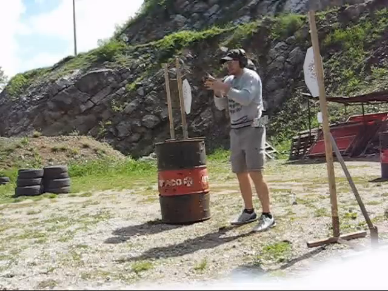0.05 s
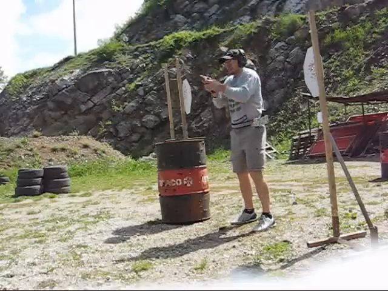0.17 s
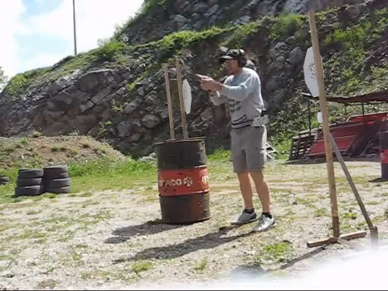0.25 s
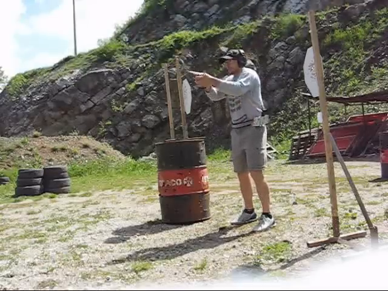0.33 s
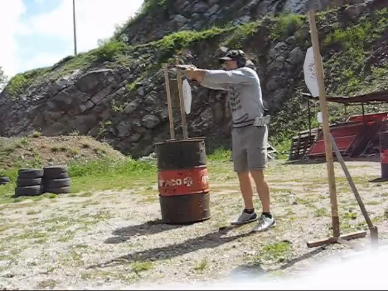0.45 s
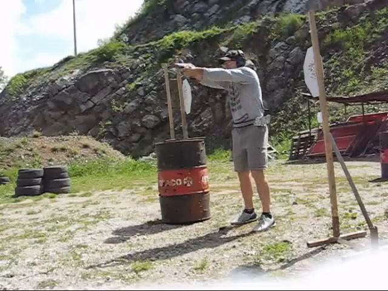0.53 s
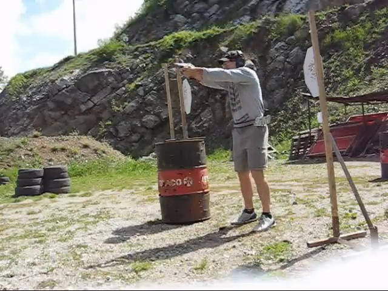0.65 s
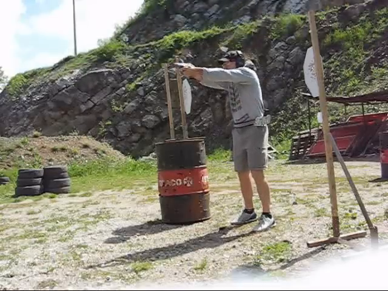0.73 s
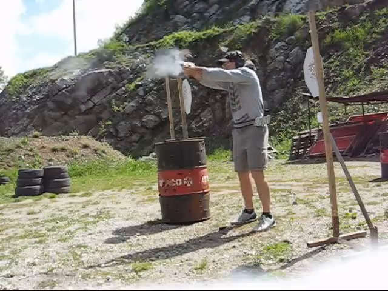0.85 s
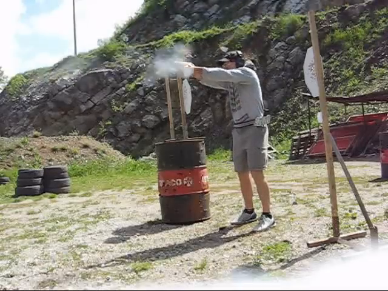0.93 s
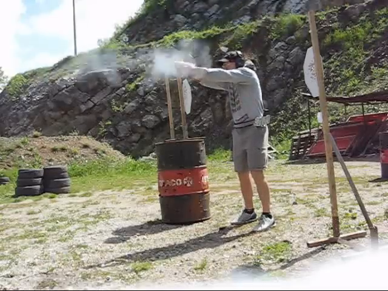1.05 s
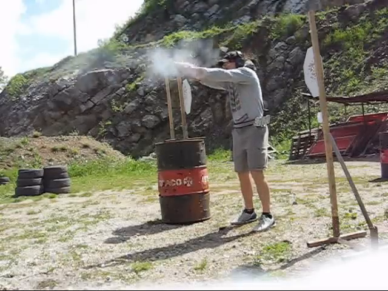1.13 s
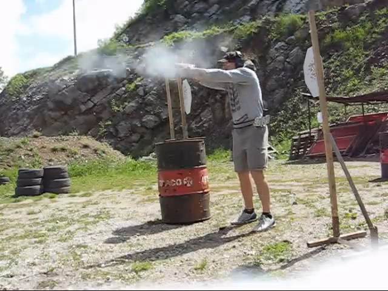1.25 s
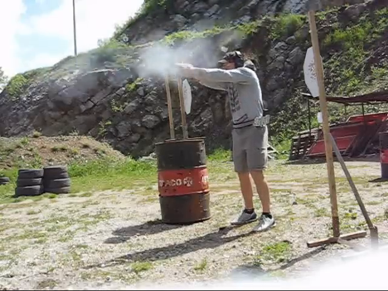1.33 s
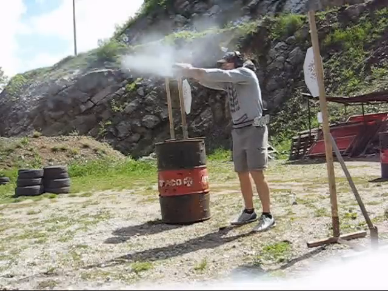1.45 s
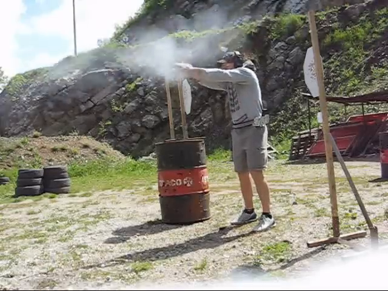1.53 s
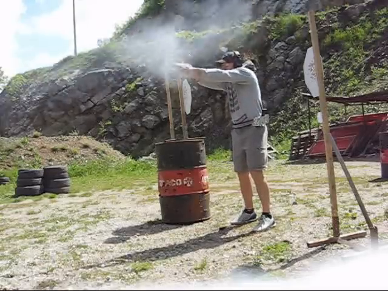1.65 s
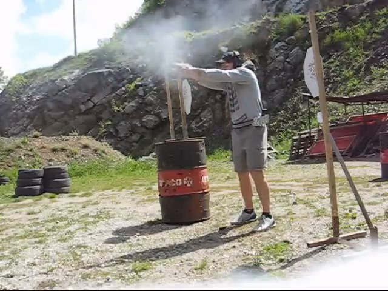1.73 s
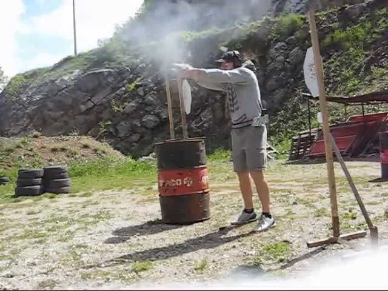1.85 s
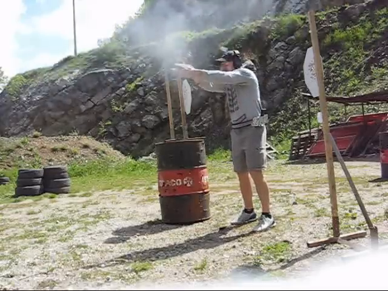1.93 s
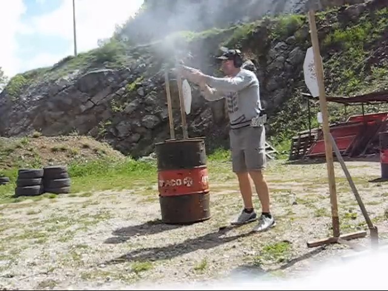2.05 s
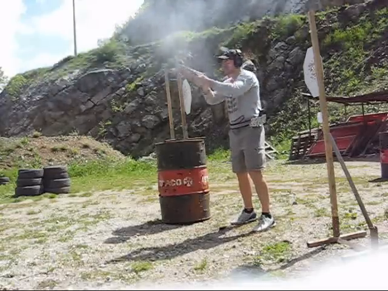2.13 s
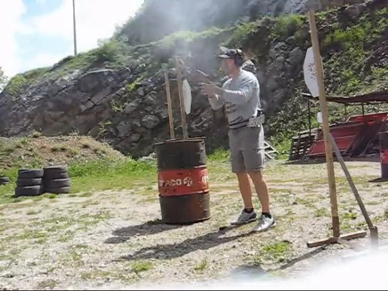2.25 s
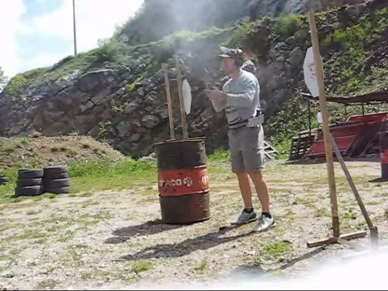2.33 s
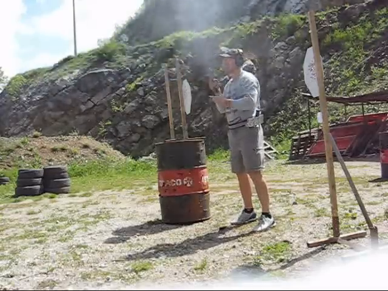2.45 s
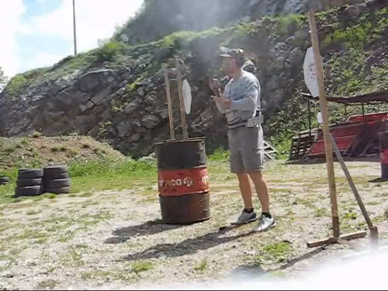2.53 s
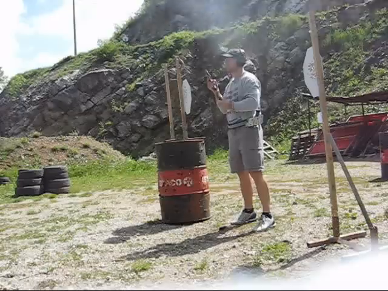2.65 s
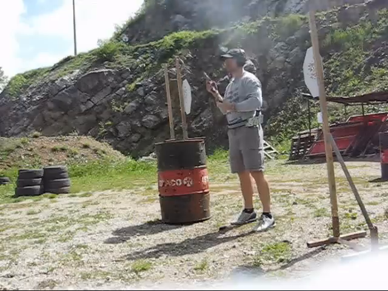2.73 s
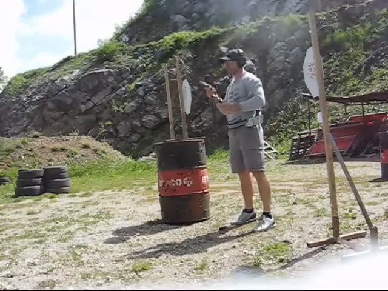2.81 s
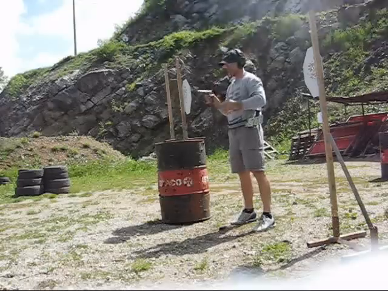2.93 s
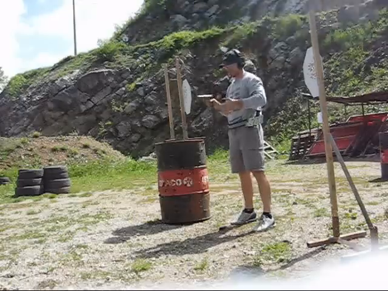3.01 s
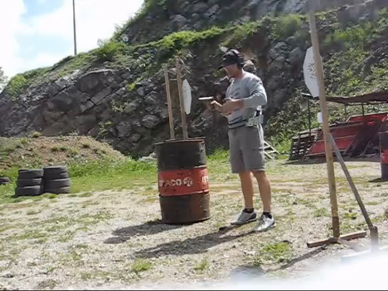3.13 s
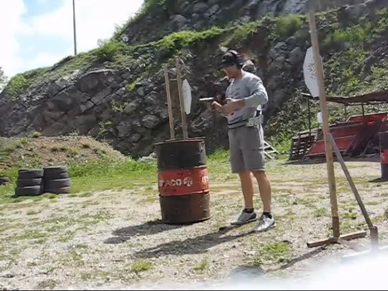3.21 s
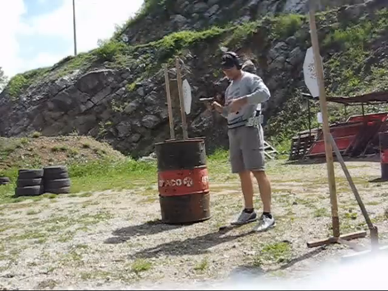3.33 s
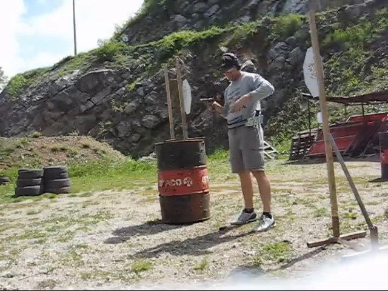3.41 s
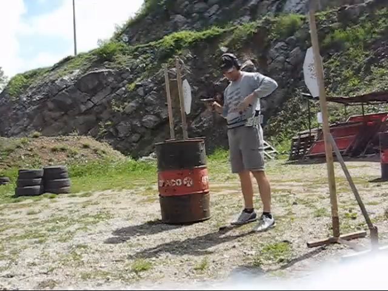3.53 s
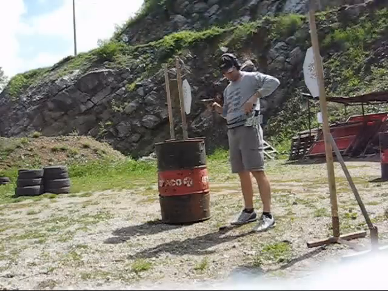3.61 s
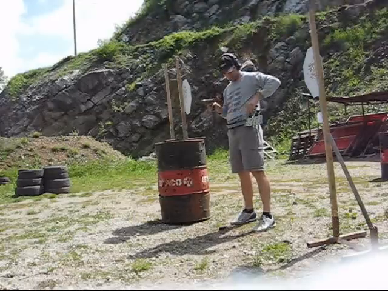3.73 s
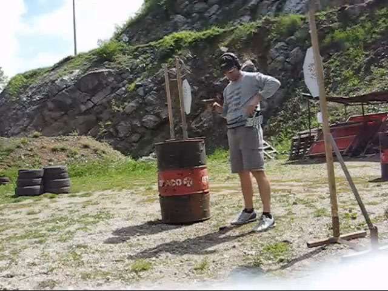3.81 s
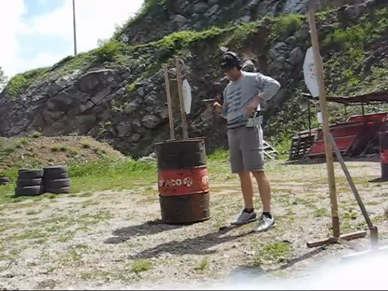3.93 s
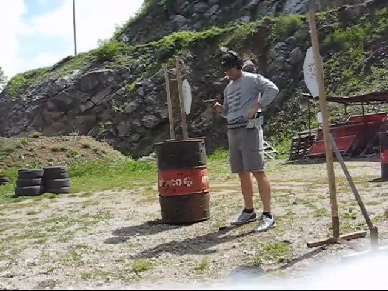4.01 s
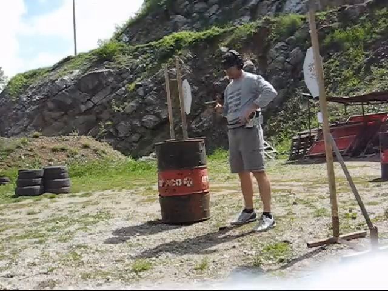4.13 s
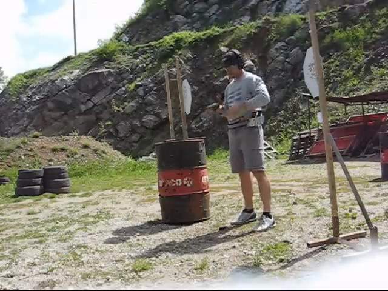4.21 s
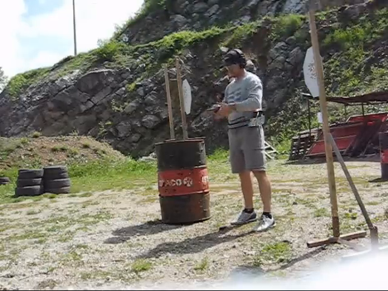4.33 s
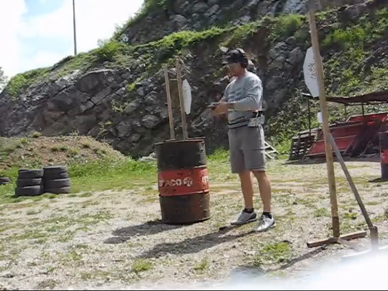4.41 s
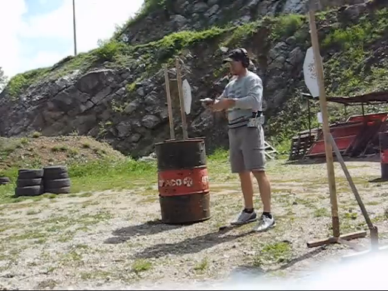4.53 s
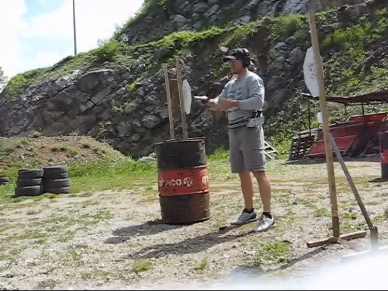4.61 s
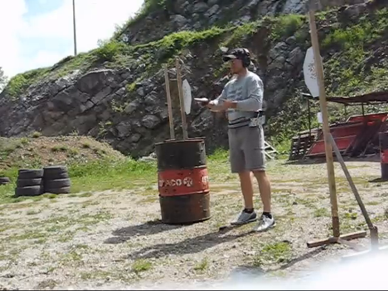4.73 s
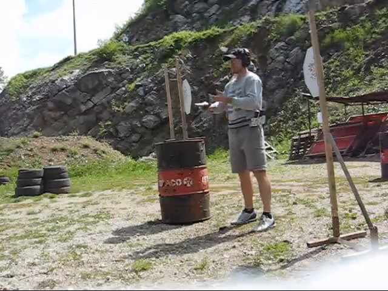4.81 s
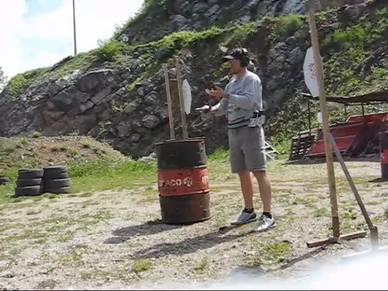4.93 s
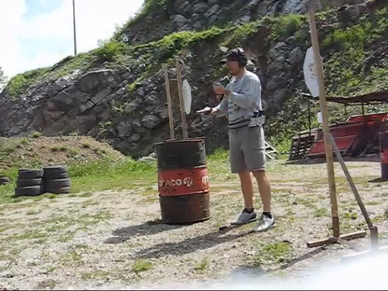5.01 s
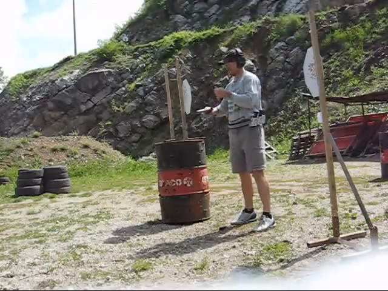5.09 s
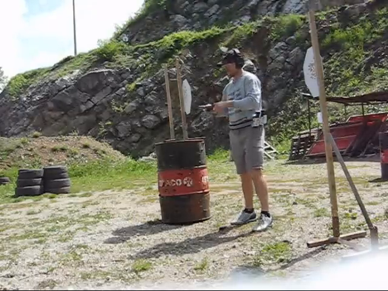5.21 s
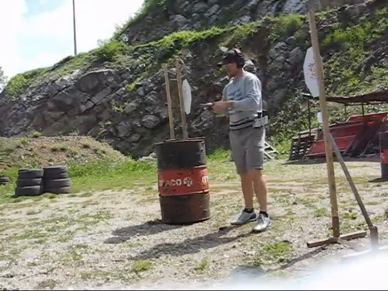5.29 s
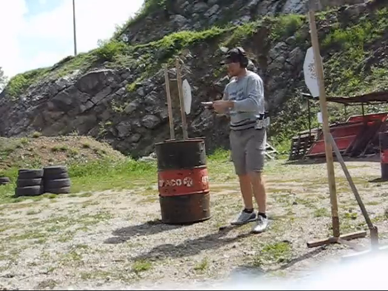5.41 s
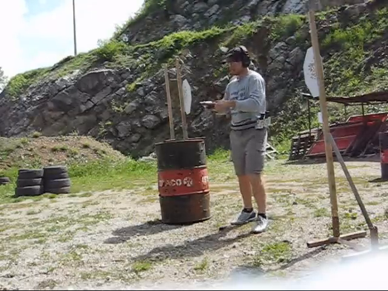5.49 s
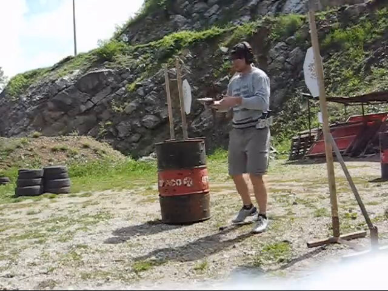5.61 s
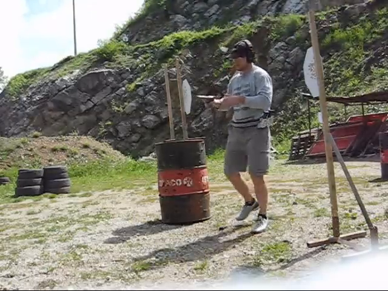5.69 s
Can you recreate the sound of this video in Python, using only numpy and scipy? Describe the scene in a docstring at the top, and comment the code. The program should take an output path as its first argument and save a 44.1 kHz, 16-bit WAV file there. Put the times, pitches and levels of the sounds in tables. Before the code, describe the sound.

A pistol is cocked, fired four times quickly outdoors with a rolling echo, then unloaded with sharp metal clicks as wind bumps the microphone.

```python
"""A pistol is cocked, fired four times beside a steel drum outdoors, then unloaded with sharp metal clicks.
Each bang rings the drum, bounces off the ground, nearby objects and a rock face, and rolls back from a
far slope a second later. Wind bumps the microphone over a faint, distant rush. A cheap camera turns
itself down at loud sounds, overloads on the shots and adds the grit of coarse 8-bit sound."""
import sys
import numpy as np
from scipy import signal
from scipy.fft import rfft, irfft, next_fast_len
from scipy.io import wavfile
from scipy.ndimage import uniform_filter1d

SR = 44100
rng = np.random.default_rng(int(sys.argv[2]) if len(sys.argv) > 2 else 0)


def master_out(mix):
    """Clip the mix to full scale and print it as 16-bit PCM to the path in sys.argv[1]."""
    frames = np.transpose(np.atleast_2d(mix))
    ceiling = np.clip(frames, -1, 1)
    pcm = np.round(ceiling * 32767).astype(np.int16)
    wavfile.write(sys.argv[1], SR, pcm)


N = 253562
T = np.arange(N) / SR

# how strong the bang is from low to high pitch: f/Hz, level/dB
BANG_SPECTRUM = [(40, -45.5), (140, -23), (230, -12.5), (340, -4.5), (440, -6.5), (580, -1.5), (820, -4.5),
                 (1050, -9.5), (1500, -9.5), (2200, -16.5), (3500, -18.5), (5800, -21), (8000, -56.5)]
# pitches at which the pistol's steel rings: f/Hz, width/Hz, level/dB
STEEL_RINGS = [(894, 1100, -0.5), (1426, 320, -4), (2295, 120, 0), (3234, 1300, 1.5), (4080, 180, 3),
               (5570, 330, 2)]


def undb(db):
    """Turn decibels into a factor to multiply by."""
    return 10 ** (np.asarray(db) / 20)


def unit(x):
    """Scale a signal to an average strength (rms) of 1."""
    return x / np.sqrt(np.mean(x ** 2))


def noise(points):
    """Noise of strength 1, shaped by rows of f/Hz, level/dB."""
    size = next_fast_len(N)
    hz, db = np.transpose(points)
    bins = np.maximum(np.fft.rfftfreq(size, 1 / SR), 1)
    gain = undb(np.interp(np.log(bins), np.log(hz), db))
    return unit(irfft(rfft(rng.standard_normal(size)) * gain, size)[:N])


def band(x, hz, width):
    """Keep the pitches around hz; a narrower band rings longer."""
    return signal.lfilter(*signal.iirpeak(hz, hz / width, fs=SR), x)


def cut(x, hz, keep, order):
    """Keep the "low" or the "high" side of hz."""
    return signal.sosfilt(signal.butter(order, min(hz, SR / 3), keep, fs=SR, output="sos"), x)


def add(out, s, x):
    """Mix x into out, starting at s seconds."""
    i = int(s * SR)
    x, i = x[max(-i, 0):], max(i, 0)
    out[i:i + len(x)] += x[:N - i]


def fade(decay_s):
    """A curve 0.1 s long that falls to about a third every decay_s."""
    return np.exp(-T[:SR // 10] / decay_s)


def swell(s, spread_s):
    """A bell-shaped rise and fall around time s."""
    return np.exp(-.5 * ((T - s) / spread_s) ** 2)


def waver(rate_hz):
    """A slow random drift of strength 1."""
    points = rng.standard_normal(N // 100)
    return unit(np.interp(T * rate_hz, np.arange(len(points)), points))


def distant_rush(waver_db=0.35, waver_hz=7):
    """Faraway outdoor noise that slowly rises and falls, and wavers a little."""
    # loudness over time: t/s, level/dB
    levels = [(0, -43.5), (.5, -38.5), (3.3, -54), (4.05, -45.5), (4.35, -50), (4.8, -47), (5.75, -48)]
    # tone of the rush: f/Hz, level/dB
    spectrum = [(40, -10.5), (250, -13), (400, -1.5), (550, 1), (750, 0.5), (1100, -7.5), (1900, -12),
                (3000, -19), (5000, -19.5), (7000, -35)]
    return undb(np.interp(T, *np.transpose(levels)) + waver_db * waver(waver_hz)) * noise(spectrum)


def wind(start_s=2.22, rise_s=.04, gust_db=-31.5, fall_db_per_s=11, breeze_db=-54.5, flutter_db=3):
    """A gust rumbles on the microphone and dies to a breeze; swirls of air push and pull on it."""
    # tone of the rumble: f/Hz, level/dB
    spectrum = [(12, -24), (30, 2.5), (65, 7), (120, -3), (200, -12.5), (400, -71)]
    # the strongest swirls: t/s, level/dB, spread/s
    swirls = [(2.253, -17, 0.013), (2.356, -16.5, 0.02), (2.435, -20, 0.029), (2.613, -19.5, .028),
              (3.01, -30.5, 0.056), (3.19, -18, 0.0099), (3.44, -29.5, 0.019), (3.788, -41, .04),
              (3.962, -41, 0.042), (4.217, -39.5, 0.023), (4.891, -29.5, 0.0098), (5.016, -27.5, 0.012),
              (5.12, -35.5, 0.015), (5.389, -32, 0.0071), (5.484, -44.5, 0.062)]
    rumble = noise(spectrum)
    age = np.maximum(T - start_s, 0)
    strength = np.minimum(age / rise_s, 1) * (undb(gust_db - fall_db_per_s * age) + undb(breeze_db))
    flutter = unit(undb(flutter_db * waver(rate_hz=14)))
    out = strength * flutter * rumble
    for s, db, spread_s in swirls:
        swing = np.sin(2 * np.pi * .55 * (T - s) / spread_s)  # smaller swirls swing faster
        out += undb(db) * swell(s, spread_s) * (undb(-4) * rumble + undb(1) * swing)
    return cut(out, 20, "high", order=2)


def contacts(rows):
    """The force of a few taps that each die away, from rows of t/s, level/dB, decay/s."""
    force = np.zeros(N)
    for s, db, decay_s in rows:
        add(force, s, undb(db) * fade(decay_s))
    return force


def knocks(hollow_hz=720, width_hz=450):
    """Soft bumps on the pistol make a dull, hollow sound."""
    # bumps while it is handled: t/s, level/dB, decay/s
    bumps = [(5.3065, -25, 0.0047), (5.326, -28, 0.013), (5.428, -33, 0.005), (5.447, -31, 0.014)]
    return contacts(bumps) * unit(band(rng.standard_normal(N), hollow_hz, width_hz))


def steel(force, rings, lowest_hz, knock_db=-8):
    """A force knocks the pistol and makes it ring; the sound is as strong as the force."""
    ring = sum(undb(db) * band(force, hz, width) for hz, width, db in rings)
    knock = undb(knock_db) * cut(force, 6000, "low", order=2)
    return unit(cut(knock + ring, lowest_hz, "high", order=2)) * np.std(force)


def scrapes(hiss_hz=5500, width_hz=3000, hiss_db=3):
    """Sliding parts rub the steel and make a short hiss."""
    # steel sliding on steel: t/s, level/dB, spread/s
    rubs = [(0.299, -21.5, .005), (4.084, -45, 0.031), (5.531, -38, 0.025)]
    pressure = sum(undb(db) * swell(s, spread_s) for s, db, spread_s in rubs)
    rings = [*STEEL_RINGS, (hiss_hz, width_hz, hiss_db)]
    return steel(pressure * rng.standard_normal(N), rings, lowest_hz=900)


def clicks(rebound_s=.0148, loose_decay_s=.006, part_width_hz=170, part_db=8, impact_db=12):
    """A loose steel part touches, strikes home and bounces back, ringing itself and the pistol."""
    # slide, magazine and hammer: t/s, level/dB, decay/s, part's ring/Hz, low cutoff/Hz,
    # time from touch to strike/s, touch and rebound compared with the strike/dB
    strikes = [(0.068, -13.5, 0.0043, 5570, 354, 0.014, -8), (.2827, -22.5, 0.0014, 2080, 900, 0.0042, -21),
               (0.308, -12, 0.0064, 4070, 340, 0.0082, -6), (0.319, -10.5, 0.0041, 3400, 347, 0.0058, -16),
               (0.916, -34, 0.0063, 5270, 2000, 0.0063, -15), (2.533, -5, 0.0037, 3970, 1190, 0.0051, -16),
               (3.255, -20, 0.0035, 3420, 1790, 0.0044, -40),
               (3.8025, -17, 0.0022, 3360, 1290, 0.0089, -14),
               (3.903, -17.5, 0.0028, 1824, 1406, 0.0074, -20),
               (4.1158, -13, 0.0035, 4210, 1070, 0.0052, -23.5),
               (4.5286, -17.5, 0.0044, 4290, 250, 0.0065, -13.5),
               (4.5704, -8.5, 0.0045, 2220, 262, 0.013, -21), (4.634, -1, 0.0029, 2765, 158, 0.0099, -16),
               (5.3263, -22, 0.0016, 3750, 398, 0.017, -22), (5.5438, -13, .0013, 2290, 596, .015, -16.5),
               (5.597, -8, 0.0055, 2174, 396, 0.024, -19), (5.6497, -8, 0.0064, 4300, 197.6, 0.0096, -16)]
    out = np.zeros(N)
    for s, db, decay_s, ring_hz, lowest_hz, lead_s, loose_db in strikes:
        touch = (0, loose_db, loose_decay_s)
        strike = (lead_s, 0, decay_s)
        ground_echo = (lead_s, -28, .02)
        rebound = (lead_s + rebound_s, loose_db, loose_decay_s)
        force = contacts([touch, strike, ground_echo, rebound])[:SR // 8]
        force *= rng.standard_normal(SR // 8)  # the parts chatter
        force[int(lead_s * SR)] += undb(impact_db)
        rings = [*STEEL_RINGS, (ring_hz, part_width_hz, part_db)]
        add(out, s - lead_s, undb(db) * steel(force, rings, lowest_hz))
    return out


def far_echo(peak_s=0.96, peak_db=-31.5, rise_db_per_s=38.5, fall_db_per_s=37, dulling_s=1.6):
    """A far slope sends the bang back as a smooth roll; the longer the trip, the duller it sounds."""
    # tone of the echo: f/Hz, level/dB
    spectrum = [(60, -26), (200, -22.5), (350, -13), (520, -2.5), (700, -2), (830, 1.5), (960, -8),
                (1150, -5), (1400, -12), (2100, -14.5), (3200, -21.5), (5400, -31), (7500, -52)]
    bright = noise(spectrum)
    dull = cut(noise(spectrum), 1300, "low", order=2)
    dull_share = np.minimum(T / dulling_s, 1) ** 2
    roll = undb(peak_db - np.maximum(rise_db_per_s * (peak_s - T), fall_db_per_s * (T - peak_s)))
    return roll * (np.sqrt(1 - dull_share) * bright + np.sqrt(dull_share) * dull)


def scattered_bang(ground_db=1, objects_db=-10.5, thinning_s=0.017, loss_db_per_s=9.5):
    """The bang bounces hard off the ground, then ever more weakly off objects farther away."""
    ground = undb(ground_db) * swell(0.0065, spread_s=0.0024)
    objects = undb(objects_db - loss_db_per_s * T) / np.sqrt(1 + (T / thinning_s) ** 2)
    return (ground + objects) * noise(BANG_SPECTRUM)


def near_echoes(decay_s=0.0041, rough_db=-9):
    """Nearby surfaces each send back a short slap; smaller ones return a higher pitch."""
    # single echoes: delay/s, level/dB, f/Hz
    slaps = [(.016, -3.5, 303), (.026, -5.5, 738), (.0335, -7, 640), (0.039, -7, 730), (.053, -14, 592),
             (.081, -19.5, 1350), (0.198, -19.5, 1070)]
    out = np.zeros(N)
    age = T[:SR // 10]
    for s, db, hz in slaps:
        rough = undb(rough_db) * unit(band(rng.standard_normal(len(age)), hz, width=900))
        add(out, s, undb(db) * fade(decay_s) * (np.sin(2 * np.pi * hz * age) + rough))
    return out


def rock_echo(delay_s=.155, spread_s=.013, db=-34.5):
    """The rock face throws back a bright spray of tiny echoes."""
    spray = unit(band(rng.standard_normal(N), hz=3200, width=3500))
    return undb(db) * swell(delay_s, spread_s) * spray


def drum():
    """The bang makes the steel drum ring with several fading tones."""
    # the drum's tones: f/Hz, level/dB, time to fade by 60 dB/s
    tones = [(266.2, -23.5, 0.28), (362.9, -25, 0.28), (389, -9, 0.13), (628, -19, 0.64), (809.7, -4, 0.13),
             (1054, -17.5, 0.15), (1311, -15, 0.19), (1650, -57, 0.051)]
    return sum(undb(db - 60 * T / ring_s) * np.sin(2 * np.pi * hz * T) for hz, db, ring_s in tones)


def shock_wave(db=8, push_s=0.00027):
    """Air pressure jumps up at once, then drops into a longer, weaker pull."""
    return undb(db) * (1 - T / push_s) * np.exp(-T / push_s)


def shots(gas_db=-14, crack_db=-10, crack_decay_s=0.00077):
    """All shots share the same shock and echoes; the churning gas and its bright crack vary."""
    # the four shots: t/s, level/dB
    firings = [(0.9223, 29.5), (1.137, 29), (1.3509, 28.5), (1.5597, 28.5)]
    bang = shock_wave() + scattered_bang() + near_echoes() + rock_echo() + drum() + far_echo()
    out = np.zeros(N)
    for s, db in firings:
        gas = undb(gas_db) * scattered_bang()
        hiss = cut(rng.standard_normal(SR // 10), 2000, "high", order=2)
        crack = fade(crack_decay_s) * unit(cut(hiss, SR / 6, "low", order=4))
        add(out, s, undb(db) * (bang + gas))
        add(out, s, undb(db + crack_db) * crack)
    return out


def scene():
    """All the sounds meet at one microphone."""
    return (shots() + clicks() + scrapes() + knocks() + wind() + distant_rush())[None]


def auto_volume(x, limit_db=-26, deepest_cut_db=30, recover_db_per_s=18):
    """Sharp, loud sounds turn the camera down at once; it creeps back up, so the echo swells."""
    window = SR // 600
    treble = cut(x, 2400, "high", order=1)
    power = uniform_filter1d(treble ** 2, window, origin=window // 5)
    excess_db = np.clip(10 * np.log10(np.maximum(power, 1e-12)) - limit_db, 0, deepest_cut_db)
    recovery_db = recover_db_per_s * T
    return x * undb(recovery_db - np.maximum.accumulate(excess_db + recovery_db))


def record(dry, ceiling=0.33, lowest_hz=22, highest_hz=5400, hiss_db=-62.5):
    """The camera squashes loud peaks, adds hum and hiss, and rounds the sound to coarse 8-bit steps."""
    # the camera's hum and whine: f/Hz, peak level/dB
    hum_tones = [(156.1, -53), (2353, -62.5)]
    x = ceiling * np.tanh(auto_volume(dry[0]) / ceiling)
    x = cut(x, highest_hz, "low", order=2)
    x = cut(x, lowest_hz, "high", order=1)
    hum = sum(undb(db) * np.sin(2 * np.pi * hz * T) for hz, db in hum_tones)
    x = x + hum + undb(hiss_db) * rng.standard_normal(N)
    # only every fourth sample is kept; quiet sounds barely reach the first step and crackle
    stepped = np.round(x[::4] * 128) / 128
    held = np.repeat(stepped, 4)[:N]
    treble_cut = signal.ellip(10, .2, 70, 15600, fs=SR, output="sos")
    return signal.sosfilt(treble_cut, held)[None]


dry = scene()
out = record(dry)
master_out(out)
```